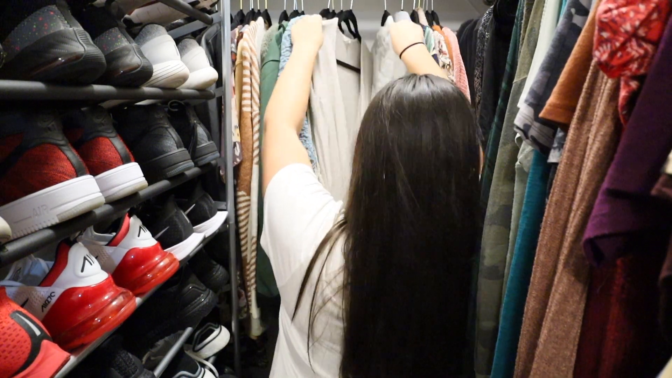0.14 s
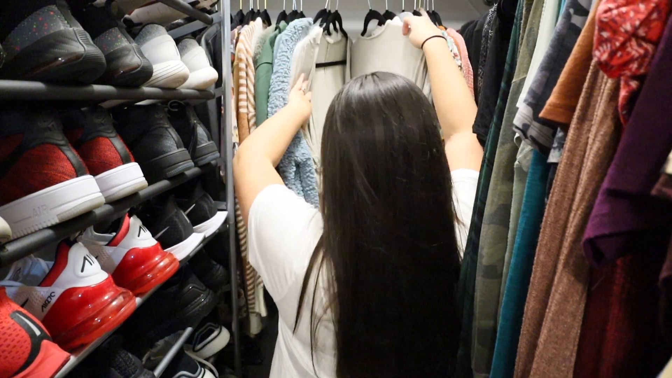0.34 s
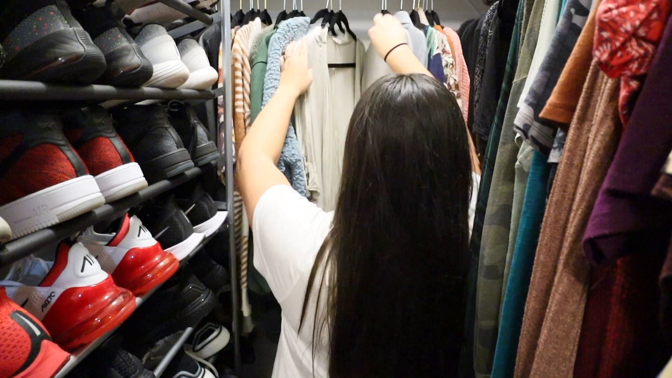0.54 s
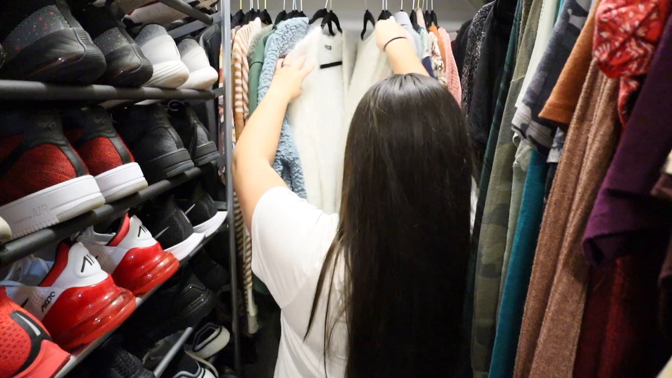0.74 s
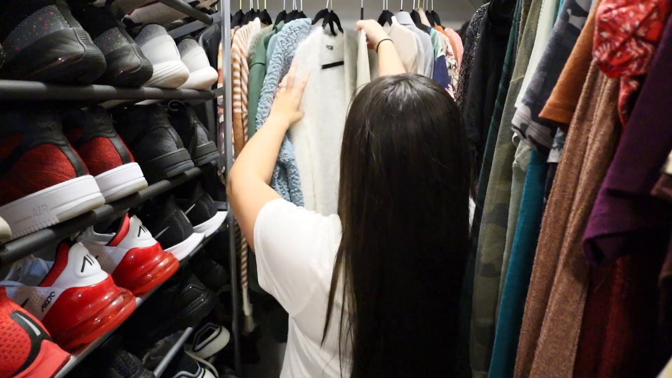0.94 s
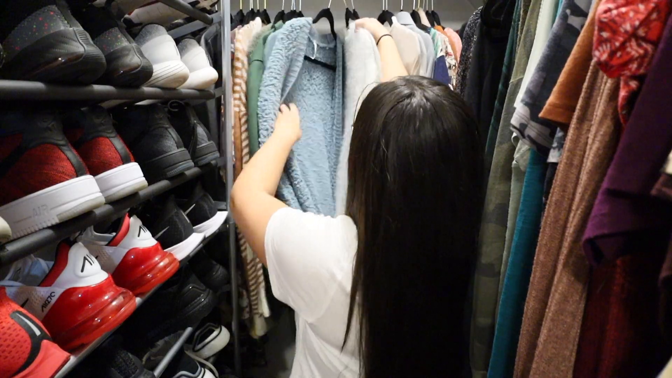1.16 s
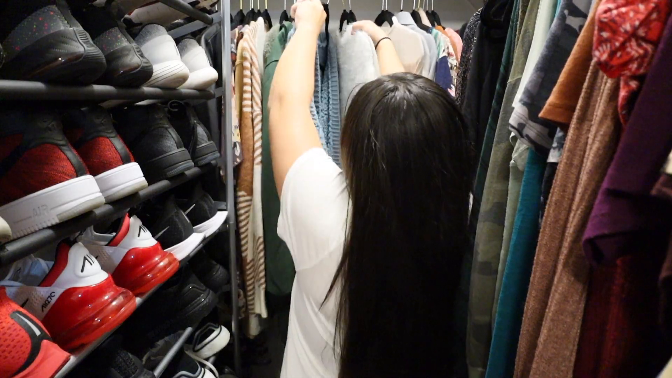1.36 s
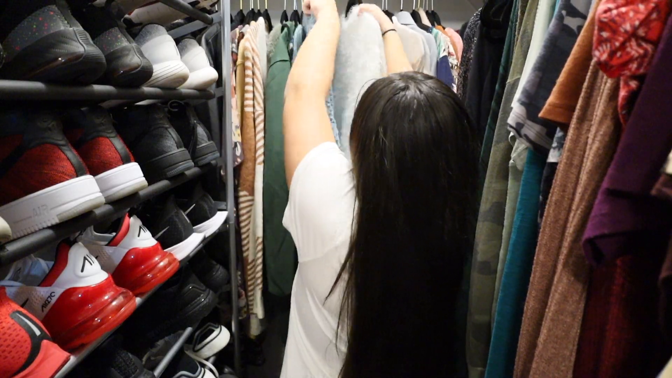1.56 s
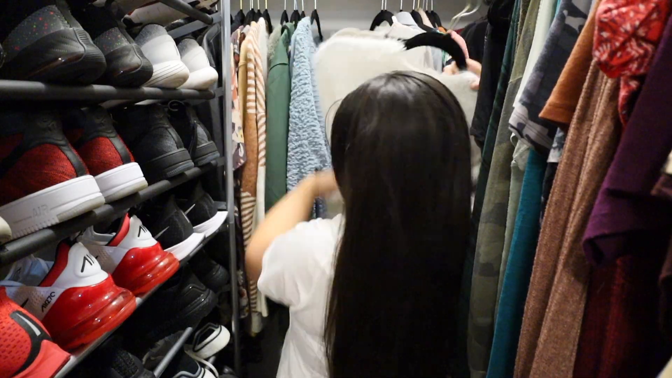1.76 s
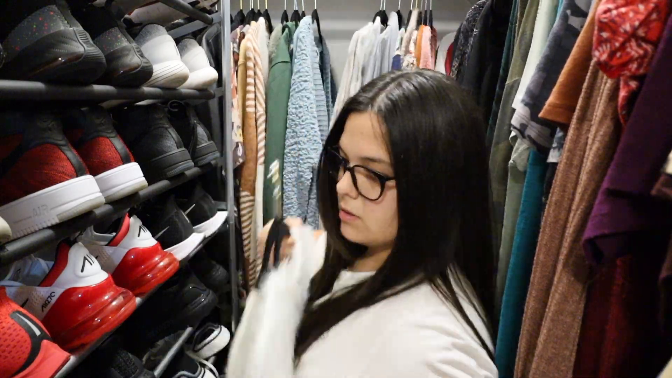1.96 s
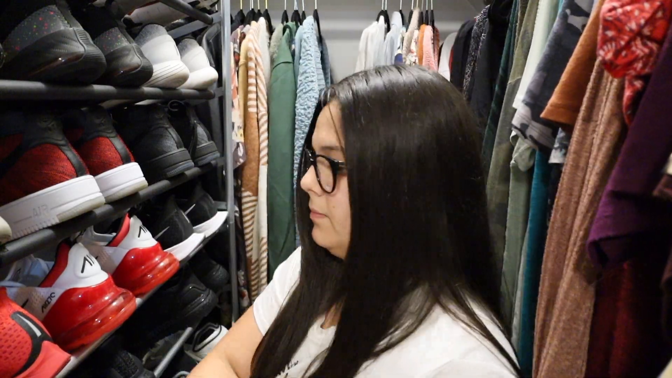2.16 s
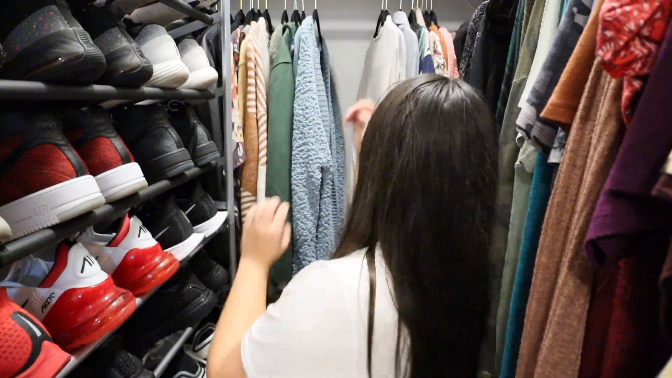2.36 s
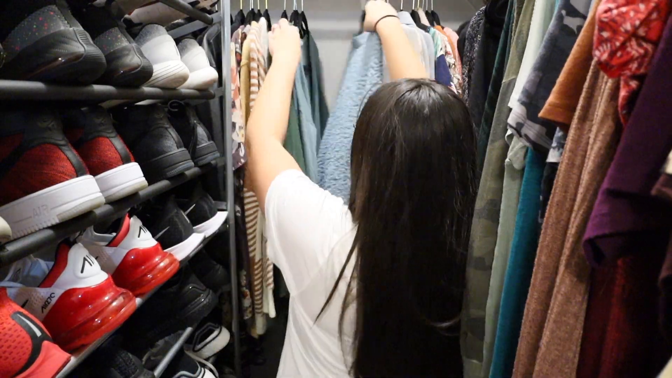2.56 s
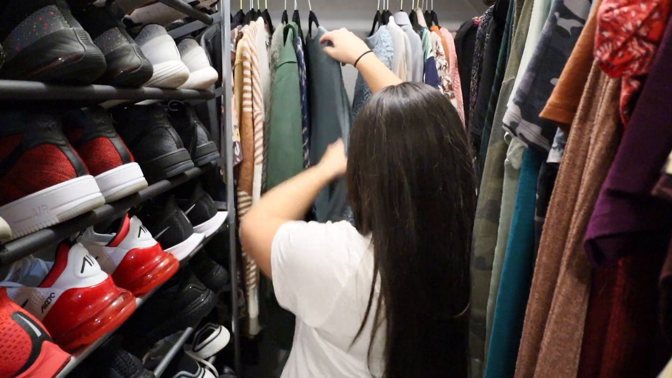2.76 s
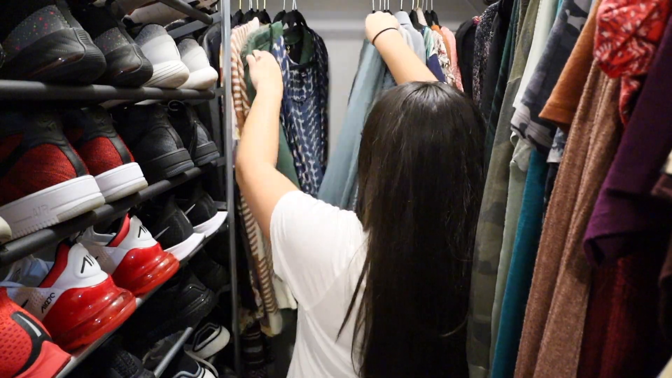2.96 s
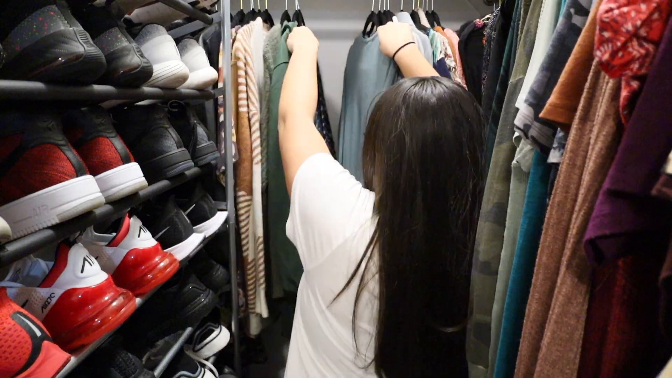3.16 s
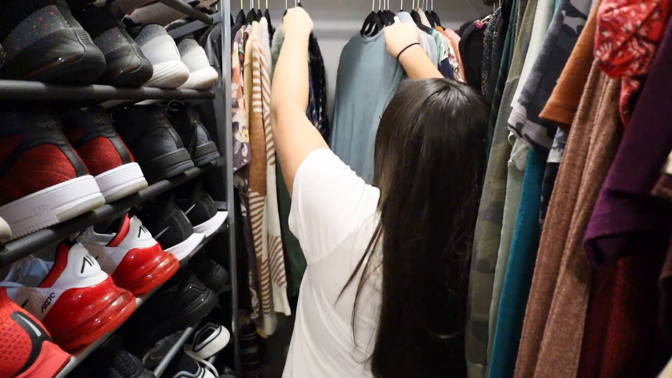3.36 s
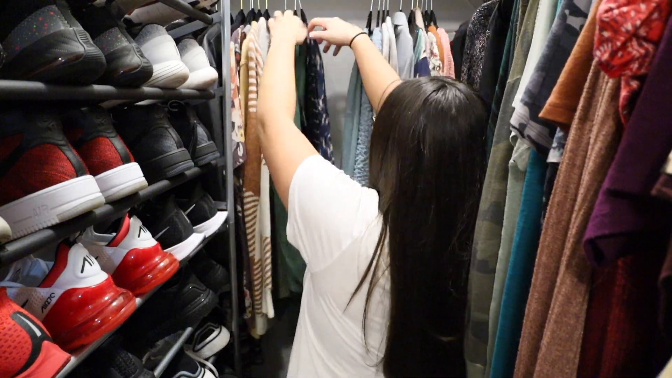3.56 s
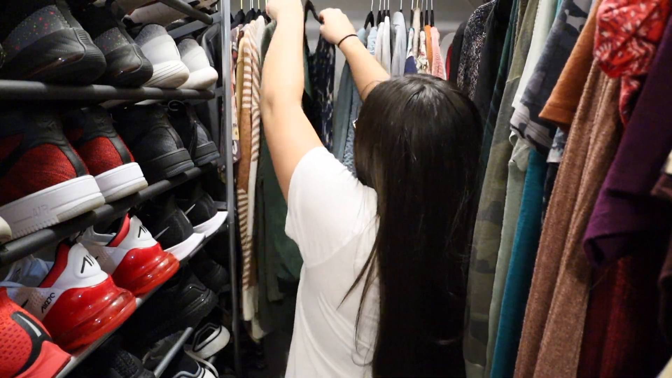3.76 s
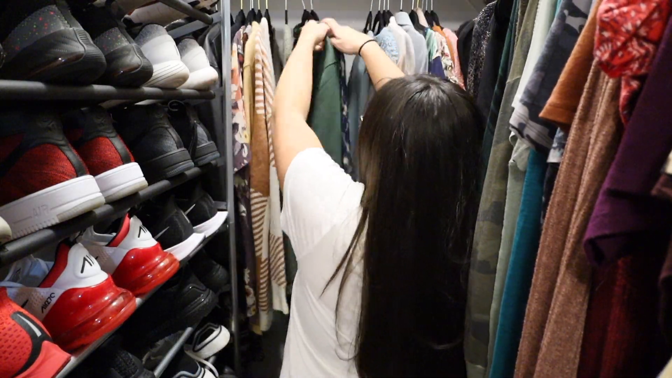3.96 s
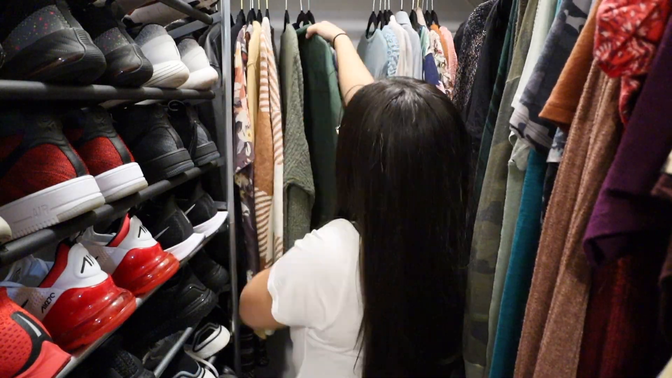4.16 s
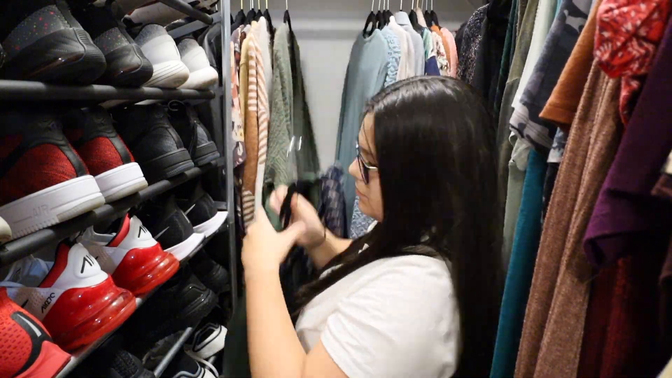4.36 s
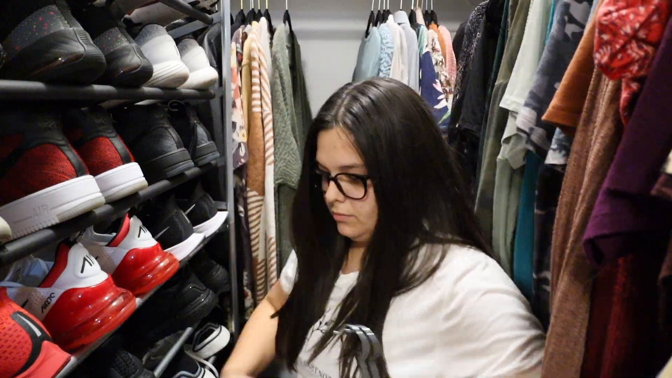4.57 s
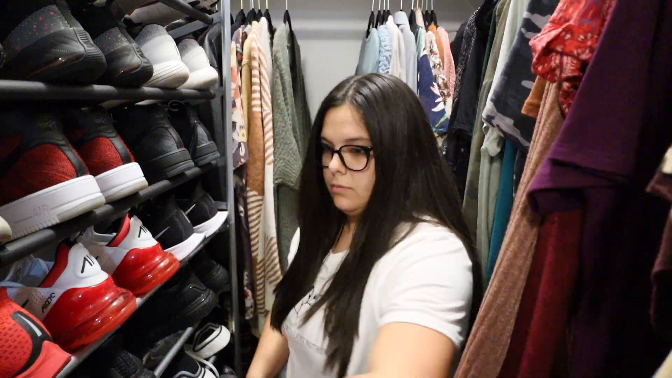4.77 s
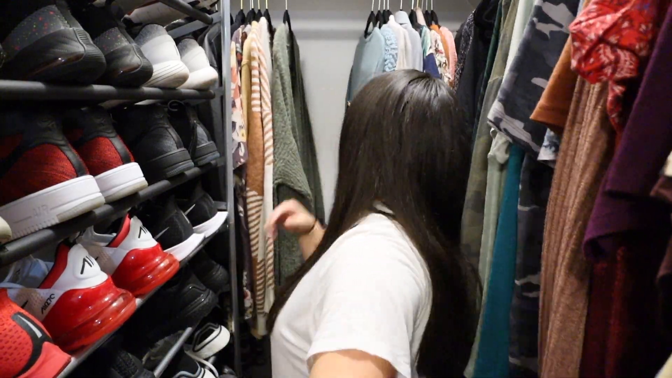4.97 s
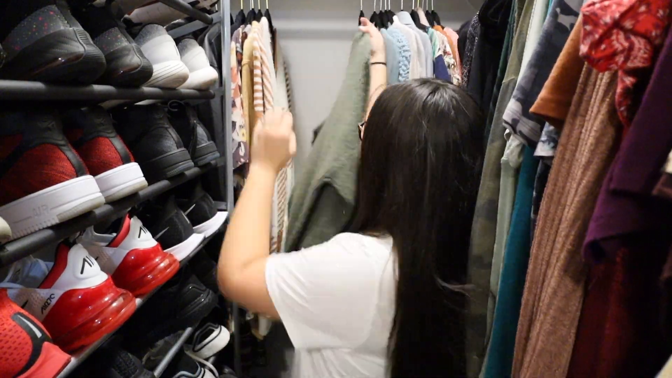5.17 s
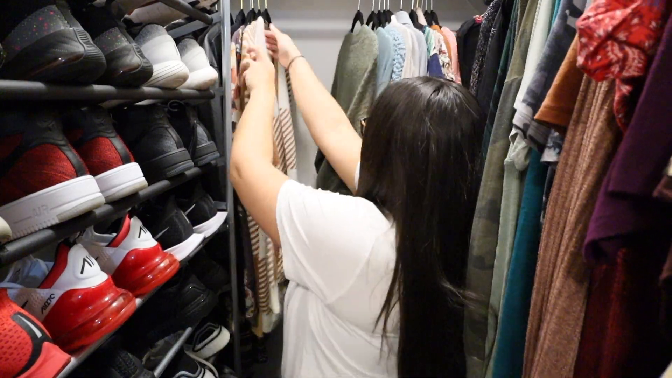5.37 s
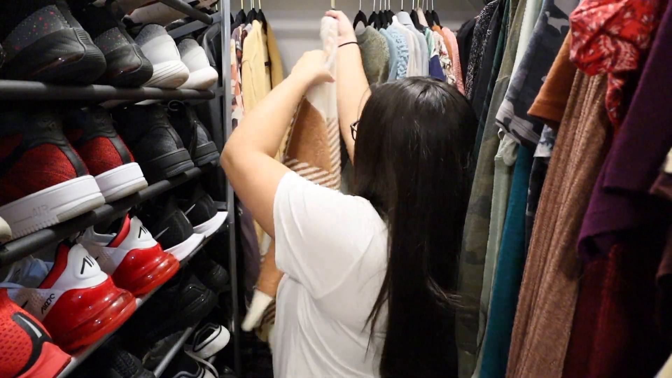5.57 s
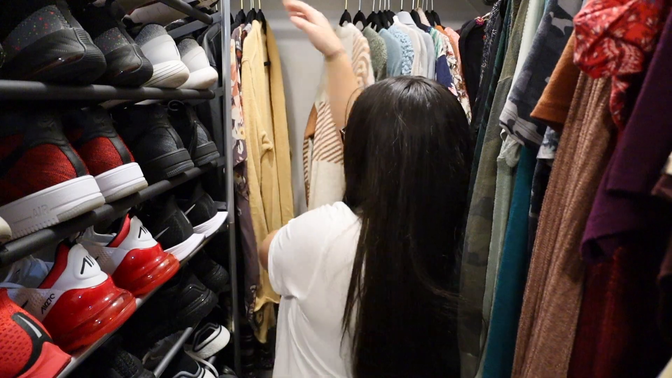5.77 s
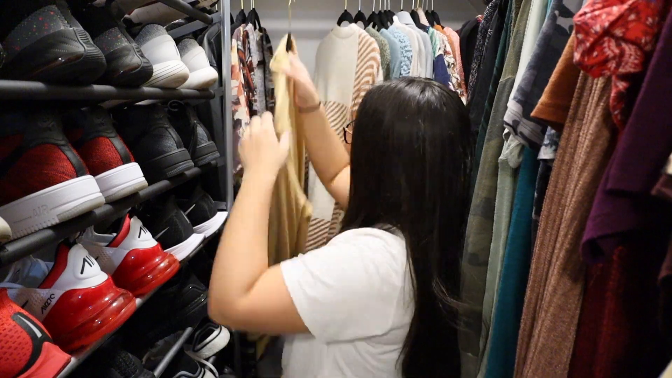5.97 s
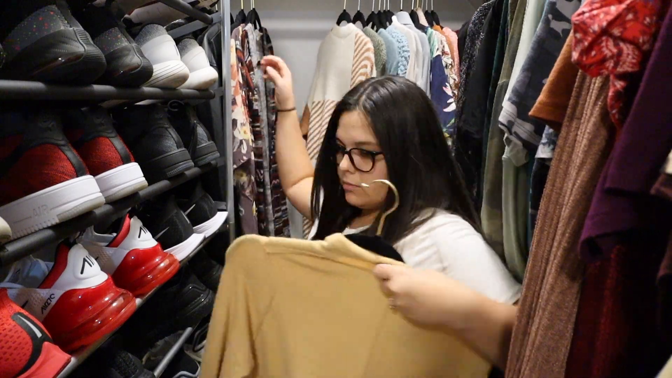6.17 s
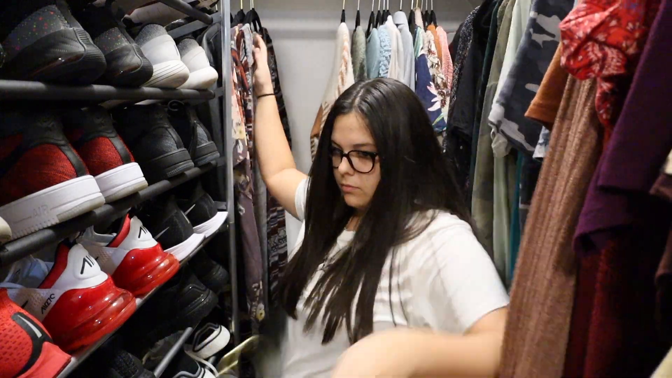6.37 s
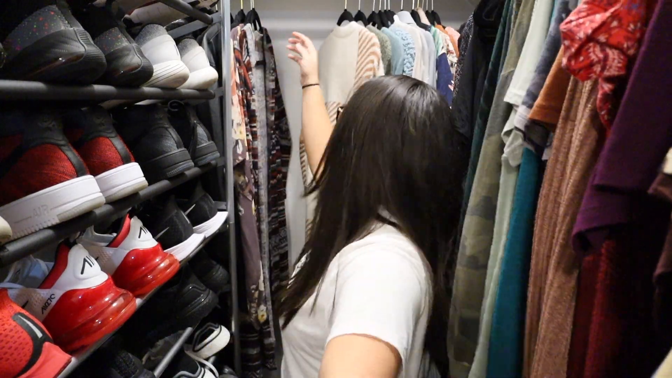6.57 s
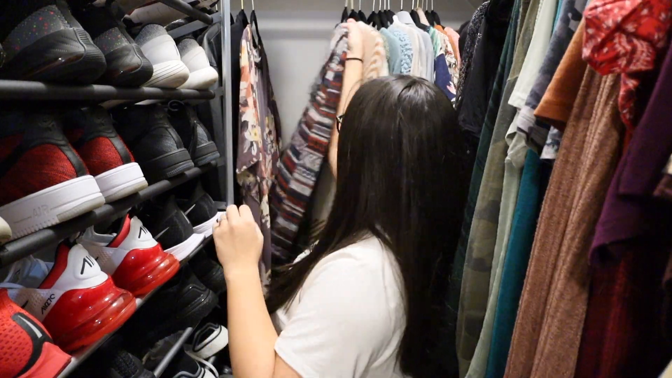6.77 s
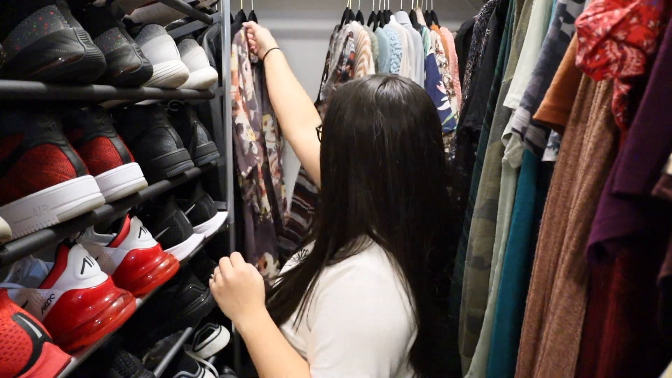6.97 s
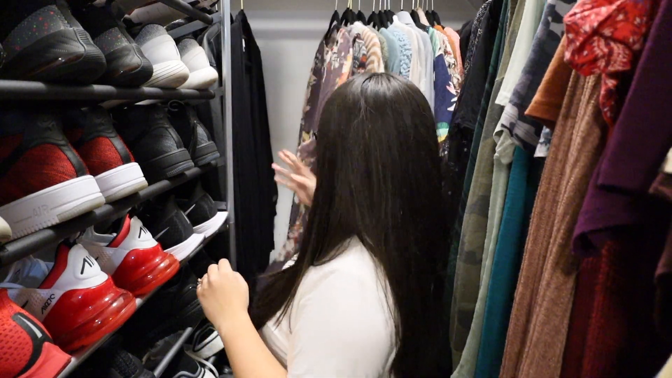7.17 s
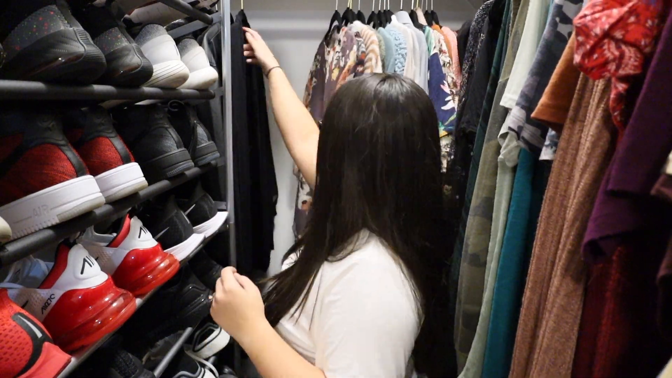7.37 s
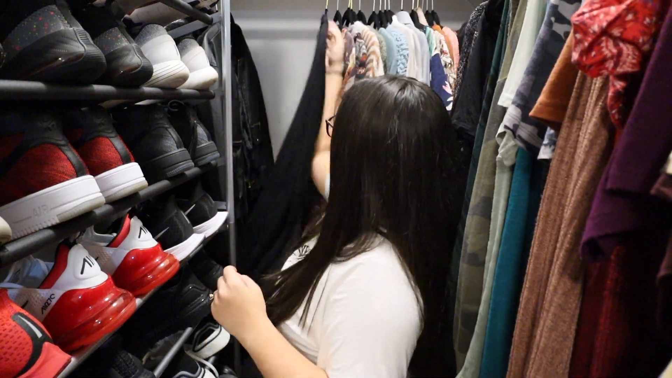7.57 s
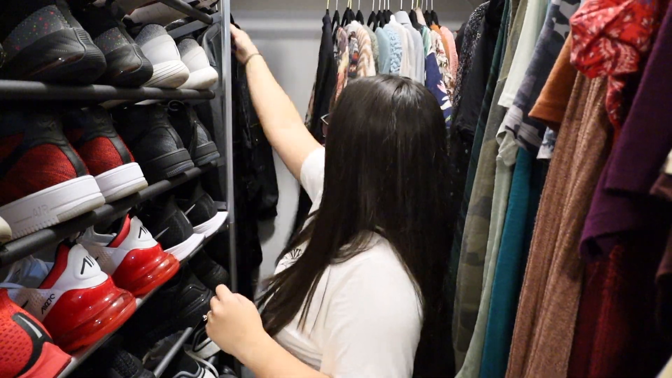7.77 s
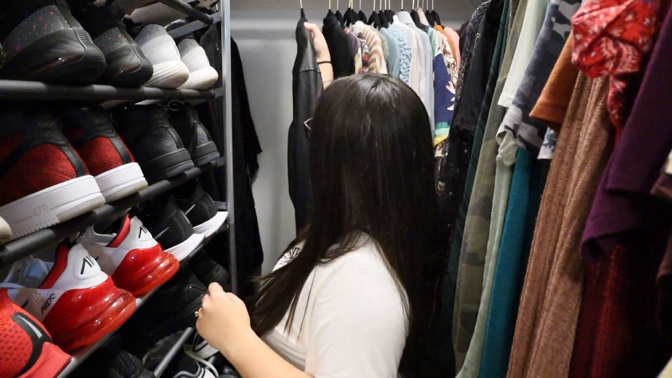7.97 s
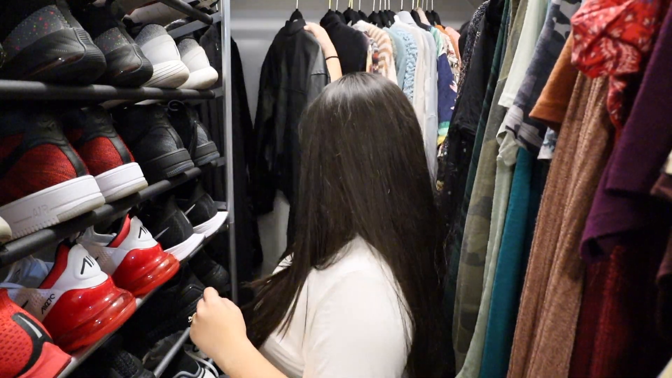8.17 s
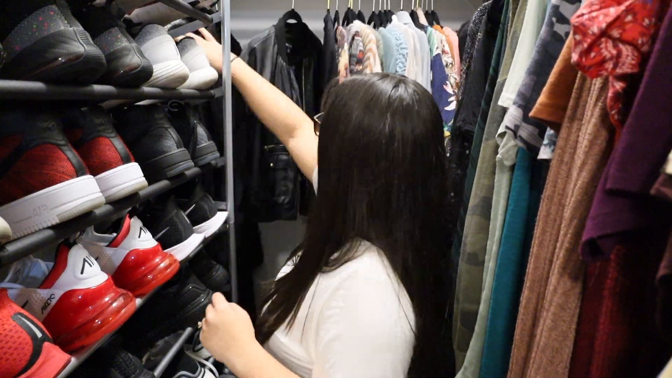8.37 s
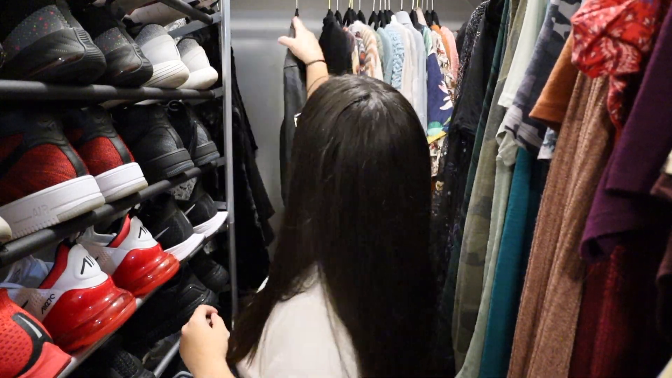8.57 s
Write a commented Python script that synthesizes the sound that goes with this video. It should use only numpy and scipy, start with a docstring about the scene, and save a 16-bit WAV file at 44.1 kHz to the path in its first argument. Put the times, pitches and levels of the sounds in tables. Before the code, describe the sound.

Close, dry sound of someone sorting clothes in a small, well-damped closet. Wire hooks rasp along a metal rod in short bright scrapes, hangers clack together, and fabric rustles softly. The touches come in uneven clusters with brief pauses, growing into stronger, more separate scrapes after about five seconds. The rod rings faintly after some slides. Low rumble and thin hiss lie underneath, with a faint hum later.

```python
"""Hangers sliding on a closet rod

Clothes are flipped through one by one in a small, well-damped closet.
Wire hooks stick and slip along a metal rod and hangers knock together: noisy forces excite damped modes.
The rod rings on faintly as two decaying mode tones, and swung garments thump as short low-pitched pulses.
Cloth rustles as shaped noise from tiny random slips; a faint two-partial hum swells in the second half.
An uneven low rumble and a thin, even hiss lie underneath."""
import sys
import numpy as np
from scipy import signal
from scipy.fft import rfft, irfft
from scipy.io import wavfile
from scipy.ndimage import uniform_filter1d

SR = 44100
rng = np.random.default_rng(int(sys.argv[2]) if len(sys.argv) > 2 else 0)


def waveform_to_disk(signal):
    """Save audio, clipped to [-1, 1], as 16-bit WAV at the path in sys.argv[1]."""
    frames = np.transpose(np.atleast_2d(signal))
    scaled = np.clip(frames, -1, 1) * 32767
    samples = np.round(scaled).astype(np.int16)
    wavfile.write(sys.argv[1], SR, samples)


N = 380450

# Low hum, interpolated in time before its waver.
# Each row: time in seconds, pitch in Hz, fundamental level in dB, octave level in dB.
HUM_COURSE = [(0, 56.6, -78, -74), (.35, 56.4, -74, -60.5), (3.3, 60.2, -86, -89), (3.6, 60.37, -59, -58.5),
              (5.25, 60, -65.5, -63), (5.42, 82.8, -55, -76.5), (5.78, 83.4, -82, -75.5),
              (5.83, 84.3, -48, -48.5), (6.3, 83.75, -47.5, -49.5), (6.6, 83.86, -50.5, -57.5),
              (7.4, 83.1, -50, -55), (8.0, 82.9, -54, -54.5), (8.12, 79.3, -47, -60),
              (8.63, 75.9, -51.5, -69)]
# Rumble of the house before its random swell. Each row: time in seconds, level in dB.
RUMBLE_LEVEL = [(0, -58.5), (1.2, -59), (1.7, -53), (2.2, -56.5), (3.1, -60.5), (4.3, -56.5), (8.63, -55.5)]
# Relative spectrum of the rumble. Each row: frequency in Hz, gain in dB.
RUMBLE_SPECTRUM = [(20, -12.5), (45, -5), (70, 3.5), (120, 1.5), (160, 3.5), (210, 2), (270, -18),
                   (400, -21.5), (800, -26), (2000, -41.5)]
# Relative spectrum of the hiss. Each row: frequency in Hz, gain in dB.
HISS_SPECTRUM = [(180, -25), (300, 0.5), (656, -10), (2000, -12.5), (2740, -14.5), (3190, -8),
                 (5610, -15.5), (12300, -16.5), (16000, -27.5)]

# Garments brushing past each other, before the overall cloth gain and flutter.
# Each row: centre in seconds, length in seconds, rustle level in dB, crisp treble level in dB.
SWISHES = [(0.142, 0.034, -51, -78), (1.29, 0.06, -62, -76), (1.82, 0.062, -58, -84),
           (2.012, 0.08, -61, -72), (2.25, 0.05, -59, -73), (2.484, 0.058, -62, -80),
           (4.043, 0.073, -57, -81), (4.37, 0.032, -62.5, -66), (4.52, .055, -57.5, -66.5),
           (4.627, 0.024, -66, -75), (4.716, 0.038, -52, -61), (5.01, 0.027, -57.5, -83),
           (5.458, 0.1, -64.5, -82), (5.697, 0.05, -67, -71), (6.031, .035, -64, -73),
           (6.497, 0.031, -59, -79), (8.299, 0.014, -62, -62), (8.42, 0.1, -59.5, -72),
           (8.62, 0.017, -51, -81)]
# Relative spectrum of the rustle. Each row: frequency in Hz, gain in dB.
RUSTLE_SPECTRUM = [(150, -31), (250, -4), (686, -8.5), (1240, -10), (1760, -12.5), (2440, -13.5),
                   (3650, -9.5), (4730, -24), (8550, -30), (16000, -35.5)]
# Relative spectrum of the crisp treble. Each row: frequency in Hz, gain in dB.
CRISP_SPECTRUM = [(2500, -23.5), (5000, -0.5), (9000, -3), (16000, -10)]
# Borders in Hz between the bands of a rustle that swell independently.
RUSTLE_BORDERS = [100, 600, 1200, 2000, 3000, 5000, 16000]
# Each sliding hanger drags its garment along; in between the clothes barely stir.
DRAG_S, DRAG_DB, STIR_DB = 0.071, -67, -75  # before the overall cloth gain and flutter

# Hangers knocking, before the small advance and gain in clicks().
# Each row: time in seconds, decay in seconds, level in dB, extra ring of the plastic in dB,
# extra ring of the wire hook in dB, extra treble in dB.
KNOCKS = [(0.036, 0.0028, -18.5, 3, 0.5, 0.5), (1.107, 0.0066, -36, -24, -7, -1),
          (1.374, 0.0054, -31.5, 4, 8.5, 1), (1.494, 0.0059, -28, -1, -3, -2.5),
          (1.577, 0.0056, -42, -11, 18.5, 12), (2.075, .0028, -49, -1, 2, 1.5),
          (2.157, 0.0068, -27, -2, -4, 4), (2.164, 0.0063, -25, 2, -8, 1.5),
          (2.187, 0.0035, -41.5, 3, -7, -1), (2.566, 0.016, -28, -1, 0, -21),
          (3.144, 0.0023, -57, -1, -4, -4), (3.244, 0.0049, -44, -13, 11, 0),
          (3.367, 0.0041, -39, 3, 11, -4), (3.422, .006, -32, -19, -4, -5), (3.5, 0.0088, -23, 2.5, 8, -4),
          (3.519, 0.0026, -45, 2, 5, 1), (3.542, 0.011, -42.5, 0.5, -10, -11),
          (3.886, 0.0053, -25, -1, 10.5, 2.5), (4.259, 0.0059, -40.5, 8, 14, 3),
          (4.379, 0.0075, -37.5, 3, -1, 5.5), (4.419, 0.0058, -40.5, 11, -3, -3.5),
          (4.831, 0.0067, -27.5, -1.5, -14, -0.5), (4.847, 0.0053, -53, 14, 8, 15),
          (5.074, 0.0025, -51, 0, -4, -1.5), (5.739, 0.019, -70, 11, -1.5, -2),
          (6.322, 0.008, -49.5, 4.5, -6, -6.5), (6.51, 0.0094, -26, 2.5, -20, 0),
          (6.537, .01, -26.5, 7.5, -11, 0), (6.577, 0.0044, -33.5, 9.5, -9, 2),
          (6.604, 0.0055, -49, 1, -7, -6), (6.838, 0.0042, -33, 2, 12.5, 5.5),
          (7.75, 0.012, -64.5, 9, -4, -8.5)]
# Hooks sliding, before the small advance in scrapes().
# Each row: time of fastest slide in seconds, rise in seconds, fall in seconds, level in dB,
# extra ring of the hanger's body in dB, of its arms in dB, extra treble in dB, mean body pitch in Hz.
SLIDES = [(.038, 0.0098, 0.011, -33.5, -5, 3, 3, 755), (.08, 0.0095, .014, -41, -6, -3, -2, 950),
          (.134, 0.014, 0.023, -37.5, 0, 7.5, -2.5, 890), (0.33, 0.02, 0.051, -53, -3.5, -3, 1, 755),
          (0.51, .022, .013, -35, 5.5, 5.5, 1, 930), (.781, 0.0053, 0.017, -30, 5.5, 1.5, 4.5, 900),
          (0.968, 0.0051, 0.02, -52, -11, -1, 0.5, 800), (1.118, 0.016, 0.0066, -30, -2, -11, -8.5, 1050),
          (1.19, 0.022, .011, -43, 4.5, 7.5, 1.5, 1144), (1.399, 0.025, 0.013, -41.5, -8, 0, -2, 756),
          (1.47, 0.027, 0.027, -41, -6.5, -5, -6, 706), (1.52, 0.0049, 0.023, -43.5, -15, -3, 4, 725),
          (1.591, 0.023, 0.025, -36, -5, -1.5, 0, 720), (1.641, .018, 0.0092, -35.5, 4, 0.5, 2, 876),
          (2.173, 0.022, 0.0065, -43, 1.5, 1, 11, 1220), (2.582, .012, 0.018, -31.5, 7.5, 10, 6, 1330),
          (2.626, 0.027, 0.011, -28, 4, -9, 3, 955), (2.653, 0.0048, 0.013, -34, -1, -7, 5.5, 890),
          (2.782, 0.0051, 0.01, -65.5, 9.5, 2, 11, 930), (2.935, 0.0077, 0.02, -37, 4.5, 9, 1, 1240),
          (2.985, 0.028, 0.021, -24.5, 4, 10, -1, 1220), (3.005, 0.0064, .02, -34.5, 6, 17.5, -10, 1300),
          (3.249, 0.015, 0.0077, -44, -0.5, 7.5, -4, 1264), (3.37, .013, 0.014, -41, -3, -4, -2, 700),
          (3.427, .007, 0.012, -46, -3, 0, 3, 660), (3.507, 0.0078, 0.016, -36, 5.5, 1, -6, 980),
          (3.694, 0.02, 0.019, -41, -2, 1, -2, 1080), (3.811, .009, .018, -35.5, -8.5, -1.5, 2, 830),
          (3.886, 0.0076, 0.02, -25.5, 2, 7, -2, 1145), (3.969, .009, 0.0099, -40.5, 5, -8, -2, 810),
          (3.999, .016, 0.021, -40, -2.5, -8, -1.5, 1300), (4.223, 0.0082, 0.018, -57, 4.5, -4, 7, 755),
          (4.266, .016, .018, -32.5, -3.5, -3, -2, 1050), (4.834, 0.011, 0.028, -43.5, -6, 0, 12, 1220),
          (4.867, .005, .019, -39.5, 4.5, 9.5, 15.5, 1180),
          (4.914, 0.0092, 0.0074, -35, -6.5, 6.5, -2.5, 1270),
          (5.166, .012, 0.03, -20.5, 4.5, 4.5, 0, 1260), (5.527, .016, 0.016, -19.5, 1.5, 7, -3, 1220),
          (5.608, .017, 0.021, -25, 6.5, 5, -4, 923), (5.675, 0.024, 0.024, -54.5, 6.5, -2, 3, 1030),
          (5.943, 0.011, .012, -27.5, -7.5, 0, 4.5, 1180), (6.226, .04, 0.034, -86, 3.5, 8.5, -5, 1210),
          (6.75, 0.0076, 0.025, -21, 5.5, 0.5, 0.5, 1260), (6.786, .009, .027, -22.5, -1, -11, 7, 1201),
          (6.831, 0.023, 0.017, -38.5, 2, 6, -2, 1450), (7.062, .018, 0.013, -20, 0.5, -1, 1, 935),
          (7.095, 0.022, 0.016, -25.5, -12, 2, -1.5, 1000), (7.533, 0.0074, 0.041, -22, 0, -5, -0.5, 920),
          (7.581, 0.0019, 0.023, -33.5, 2.5, -1, 6.5, 1080), (7.874, 0.013, 0.016, -19.5, 0, -14, -3, 940),
          (7.902, 0.018, 0.012, -31, 0, -5, 4, 960), (7.99, 0.017, 0.039, -74, 6.5, 5, 0, 934)]
# Modes of a hanger on the rod, before random scatter and the register balance.
# Each row: frequency in Hz, bandwidth in Hz, gain in dB.
HANGER_MODES = [(205, 42, -9.5), (489, 28, -18.5), (771.5, 16, -14.5), (867, 50, -13.5), (1247, 17, -12),
                (1490, 23, -18), (1730, 73, -17), (1890, 380, -19.5), (2212, 37, -12.5), (2400, 70, -15.5),
                (2614, 77, -11.5), (3003, 160, -4.5), (3164, 29, 4.5), (3362, 110, -0.5), (3620, 70, -0.5),
                (3790, 140, -13), (3930, 38, -16), (4388, 43, -10), (5146, 260, -12.5), (5900, 110, -19.5),
                (6700, 70, -15.5), (8550, 42, -18.5), (8973, 130, -5.5), (9005, 110, -3), (9600, 70, -16.5),
                (10430, 560, -22)]
# Relative spectrum of bare contact noise between the modes. Each row: frequency in Hz, gain in dB.
CONTACT_SPECTRUM = [(60, -37), (200, -27.5), (400, -29.5), (650, -27), (1000, -15), (2200, -24.5),
                    (3500, -6.5), (5000, -21.5), (7500, -21), (9000, -28.5), (10500, -18), (13000, -28.5),
                    (16000, -35)]
# Borders in Hz between a hanger's registers: thud, body, arm, hook, grit, wire, fizz.
REGISTER_BORDERS = [600, 1500, 2800, 4300, 8400, 9700]
# A light touch sounds dull and a hard one bright. Rows: thud, body, arm, grit, wire, fizz.
# Each row: level against the hook register at the usual strength in dB, gain in dB per dB of extra strength.
SLIDE_BALANCE = [(-20.5, -0.93), (-11.5, -0.47), (-13.5, -0.28), (-14, 0.017), (-12.5, 0.26),
                 (-18.5, 0.042)]
# The same for knocks.
# Each row: level against the hook register at the usual strength in dB, gain in dB per dB of extra strength.
KNOCK_BALANCE = [(-16.5, -0.87), (-16.5, -0.47), (-12, -0.25), (-8, -0.27), (-8.5, 0.15), (-10, -0.28)]
USUAL_DB = -30
WIRE_SHARE = 0.45  # of a slide's extra treble, the part that reaches the wire's ring

# Soft thumps of swung garments and bumped hangers.
# Each row: centre in seconds, pitch in Hz, length in seconds, level in dB.
THUMP_PULSES = [(.134, 480, 0.011, -48.5), (1.188, 225, 0.017, -43), (2.113, 273, .019, -50.5),
                (2.131, 54, 0.016, -36.5), (2.167, 62, 0.018, -46), (3.886, 480, 0.0055, -39),
                (4.739, 49.7, 0.063, -52), (4.832, 52, 0.018, -39.5), (4.876, 90, 0.023, -49.5),
                (6.482, 44, .024, -35), (6.54, 197, 0.0042, -32.5)]

# The rod's pair of long modes, one for each bending direction.
# Each row: frequency in Hz, 60 dB decay time in seconds, relative level in dB.
ROD_MODES = [(3120, 0.28, 5.5), (3080, .22, -2.5)]
# The rod ringing on as a hook lets go. Each row: start in seconds, level in dB before the mode levels.
ROD_RINGS = [(0.507, -48), (0.791, -44), (2.629, -45), (2.998, -48), (3.886, -54), (4.272, -48),
             (5.178, -48.5), (5.61, -50), (5.953, -57), (6.809, -43), (7.068, -49.5), (7.562, -38),
             (7.879, -52)]

TOP_HZ = 15900
SIZE = 16384  # samples in one short sound
TIME = np.arange(N) / SR
LOCAL = (np.arange(SIZE) - SIZE // 2) / SR  # seconds from the middle of a short sound
FREQ = np.fft.rfftfreq(SIZE, 1 / SR)


def undb(db):
    """Amplitude gain is the antilogarithm of a level in decibels."""
    return 10 ** (np.asarray(db) / 20)


def colour(points, freq):
    """A spectrum is drawn by joining (Hz, dB) points on a logarithmic frequency axis."""
    hz, db = np.transpose(points)
    return undb(np.interp(np.log(freq + 1), np.log(hz), db))


def shaped(x, points):
    """Linear filtering: a signal takes on a given spectrum, here at unit rms."""
    gain = colour(points, np.fft.rfftfreq(N, 1 / SR))
    y = irfft(rfft(x) * gain, N)
    return y / y.std()


def curves(table):
    """Linear interpolation in time turns the columns of a table into curves, sample by sample."""
    s, *columns = np.transpose(table)
    return [np.interp(TIME, s, c) for c in columns]


def walk(rate):
    """Band-limited fluctuation: random points, rate a second, joined by lines; spread near 1."""
    return 1.2 * np.interp(TIME * rate, np.arange(4096), rng.standard_normal(4096))


def add(out, s, sound):
    """Superposition: mix in a short sound whose middle falls at time s."""
    start = int(s * SR) - SIZE // 2
    lo, hi = max(start, 0), min(start + SIZE, N)
    out[lo:hi] += sound[lo - start:hi - start]


def slips(size, rate, spread_db):
    """Friction as shot noise: tiny random slips, rate a second, of uneven strength; unit rms."""
    happens = rng.random(size) < rate / SR
    strength = undb(spread_db * rng.standard_normal(size))
    x = happens * strength * rng.choice([-1, 1], size)
    return x / x.std()


def hum(waver_db=1.75):
    """Harmonic tone: a fundamental and its octave share one phase, wavering in pitch and level."""
    hz, first_db, second_db = curves(HUM_COURSE)
    phase = 2 * np.pi * np.cumsum(hz + .5 * walk(21)) / SR
    fundamental = undb(first_db + waver_db * walk(13)) * np.sin(phase)
    octave = undb(second_db + waver_db * walk(7.7)) * np.sin(2 * phase)
    return np.sqrt(2) * (fundamental + octave)


def house(swell_db=2.5, air_db=-70.5):
    """Filtered noise: an uneven low rumble under a thin, even hiss."""
    level_db, = curves(RUMBLE_LEVEL)
    rumble = shaped(rng.standard_normal(N), RUMBLE_SPECTRUM) * undb(level_db + swell_db * walk(7.4))
    hiss = undb(air_db) * shaped(rng.standard_normal(N), HISS_SPECTRUM)
    return rumble + hiss


def swells(rows):
    """Incoherent sources add in power: soft Gaussian swells from (s, length s, level dB)."""
    power = np.zeros(N)
    for s, length, db in rows:
        add(power, s, undb(db) ** 2 * np.exp(-(LOCAL / length) ** 2))
    return power


def patchy(x, depth_db, rate):
    """Independent band modulation: each band swells and fades alone, so the colour keeps shifting."""
    spectrum = rfft(x)
    band = np.searchsorted(RUSTLE_BORDERS, np.fft.rfftfreq(N, 1 / SR))
    # band 0, below the lowest border, is left out
    return sum(irfft(spectrum * (band == k), N) * undb(depth_db * walk(rate))
               for k in range(1, len(RUSTLE_BORDERS)))


def cloth(gain_db=-0.94, flutter_db=2.3, snag_db=-9.5):
    """Fibre friction: uneven brushing in soft swells, with a tiny tick now and then as a fibre snags."""
    drags = [(s, DRAG_S, DRAG_DB) for s, *_ in SLIDES]
    brushes = [(s, length, db) for s, length, db, _ in SWISHES]
    crisp_brushes = [(s, length, db) for s, length, _, db in SWISHES]
    rustle_level = np.sqrt(undb(STIR_DB) ** 2 + swells(drags) + swells(brushes))
    crisp_level = np.sqrt(swells(crisp_brushes))
    fibres = slips(N, 11000, 3.5) + undb(snag_db) * slips(N, 27, 2.0)
    rustle = rustle_level * patchy(shaped(fibres, RUSTLE_SPECTRUM), depth_db=3.5, rate=22)
    crisp = crisp_level * shaped(slips(N, 6000, 3.5), CRISP_SPECTRUM)
    return (rustle + crisp) * undb(gain_db + flutter_db * walk(40))


def balance(rule, db, body_db, arm_db, wire_db, treble_db):
    """Spectral balance follows a contact's strength, how freely each part rings and how sharp the touch is."""
    usual_db, growth = np.transpose(rule)
    extra_db = np.array([0, body_db, arm_db, treble_db, wire_db, treble_db])
    return usual_db + growth * (db - USUAL_DB) + extra_db


def hanger(force, envelope, tint, body_hz, contact_db, smear_t60):
    """Modal superposition: a contact force drives damped resonances, scattered afresh at each contact."""
    detune, scatter_db = 0.0062, 4.5  # relative spread of pitch, spread of mode gain
    body_mode = (body_hz, 105, -6.0)  # Hz, bandwidth Hz, dB
    hz, width, db = np.transpose(HANGER_MODES + [body_mode])[:, :, None]
    chance = rng.standard_normal((len(hz), 3, 1))
    pitch = hz + detune * np.minimum(hz, 2500) * chance[:, 0]
    gain = undb(db + scatter_db * chance[:, 1]) * np.sign(chance[:, 2])
    damping = 1j * FREQ * width
    modes = (gain * damping / (pitch ** 2 - FREQ ** 2 + damping)).sum(0)
    # countless weak, short modes smear every slip over a few milliseconds
    smear = rng.standard_normal(SIZE) * undb(-60 * TIME[:SIZE] / smear_t60)
    contact = rfft(smear / np.linalg.norm(smear)) * colour(CONTACT_SPECTRUM, FREQ)
    spectrum = rfft(force) * (modes + undb(contact_db) * contact)
    # each register gets its share of the energy, with the hook at 0 dB
    register = np.searchsorted(REGISTER_BORDERS, FREQ)
    energy = 2 * np.bincount(register, abs(spectrum) ** 2) / SIZE
    target_db = np.array([*tint[:3], 0, *tint[3:]])
    trim_db = target_db + 10 * np.log10(np.sum(envelope ** 2) / energy)
    # averaging over 120 frequency bins softens the steps between registers
    return irfft(spectrum * undb(uniform_filter1d(trim_db[register], size=120)))


def clicks(blow=3.5, chatter=0.78, gain_db=-0.5):
    """Impact excitation: a sharp blow, then a few milliseconds of chatter between the touching parts."""
    out = np.zeros(N)
    for s, decay, db, plastic_db, wire_db, treble_db in KNOCKS:
        fade = (LOCAL >= 0) * np.exp(-abs(LOCAL) / decay)
        # the chatter force dies faster than the envelope that sets the energy
        force = blow * (LOCAL == 0) + fade ** (1 / chatter) * slips(SIZE, 5000, 1.6)
        tint = balance(KNOCK_BALANCE, db, plastic_db, plastic_db, wire_db, treble_db)
        knock = hanger(force, fade, tint, body_hz=1030, contact_db=7.5, smear_t60=0.0065)
        add(out, s - .001, undb(db + gain_db) * knock)
    return out


def scrapes(rate=1700, spread_db=4.5, roundness=2.06, lead_s=.0045):
    """Stick-slip friction: a hook speeds up and stops, sticking and slipping on the rod all the way."""
    out = np.zeros(N)
    for s, rise, fall, db, body_db, arm_db, treble_db, body_hz in SLIDES:
        speed = np.exp(-(abs(LOCAL) / np.where(LOCAL < 0, rise, fall)) ** roundness)
        force = speed * slips(SIZE, rate, spread_db)
        tint = balance(SLIDE_BALANCE, db, body_db, arm_db, WIRE_SHARE * treble_db, treble_db)
        slide = hanger(force, speed, tint, body_hz, contact_db=-1.0, smear_t60=0.024)
        # the force runs a little ahead of the ringing that it builds up
        add(out, s - lead_s, undb(db) * slide)
    return out


def closet(x, wet_db=-16.5, t60=0.041):
    """Reverberation in a damped space: near walls answer at once and the clothes soak up the rest."""
    age = TIME[:SIZE]
    tail = rng.standard_normal(SIZE) * (age > .002) * undb(-60 * age / t60)
    return x + undb(wet_db) * signal.fftconvolve(x, tail / np.linalg.norm(tail))[:N]


def thumps():
    """Displacement of air: a swung garment or bumped hanger gives a short Gaussian pulse of slow cycles."""
    out = np.zeros(N)
    for s, hz, length, db in THUMP_PULSES:
        swing = np.exp(-(LOCAL / length) ** 2) * np.cos(2 * np.pi * hz * LOCAL)
        add(out, s, -np.sqrt(2) * undb(db) * swing)
    return out


def rod(build_s=0.0095):
    """Beating of close modes: the rod's long modes build up quickly, then die with a rapid, shallow flutter."""
    out = np.zeros(N)
    for s, db in ROD_RINGS:
        start = int(s * SR)
        age = TIME[:min(SR // 2, N - start)]
        ring = sum(undb(mode_db - 60 * age / t60) * np.sin(2 * np.pi * hz * age)
                   for hz, t60, mode_db in ROD_MODES)
        out[start:start + len(age)] += undb(db) * (1 - np.exp(-age / build_s)) * ring
    return out


def scene():
    """Superposition of hangers in the closet, rod, garments and background; only hangers get the closet's tail."""
    hangers = closet(scrapes() + clicks())
    return (hangers + rod() + thumps() + cloth() + hum() + house())[None]


def record(dry):
    """Band limiting: the recorder cuts the top with a steep elliptic low-pass."""
    low_pass = signal.ellip(10, .2, 70, TOP_HZ, fs=SR, output="sos")
    return signal.sosfilt(low_pass, dry)


dry = scene()
out = record(dry)
waveform_to_disk(out)
```